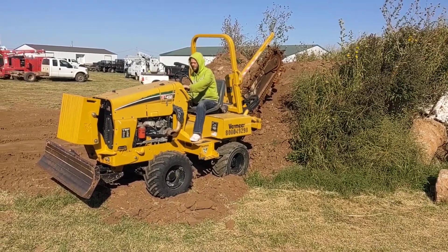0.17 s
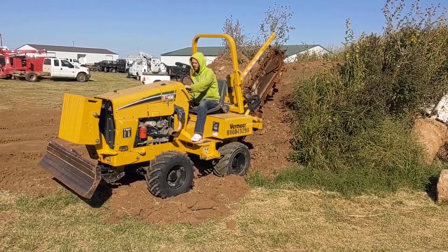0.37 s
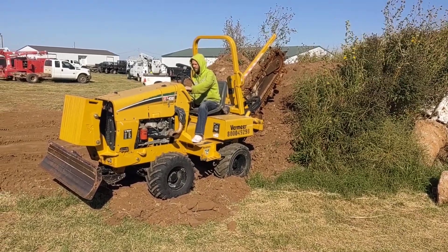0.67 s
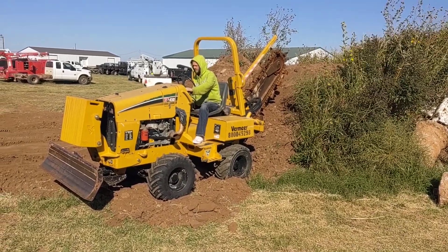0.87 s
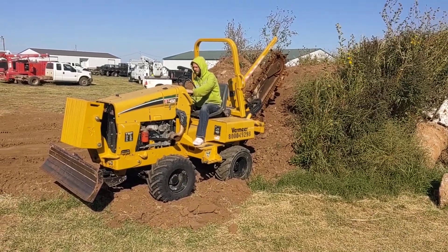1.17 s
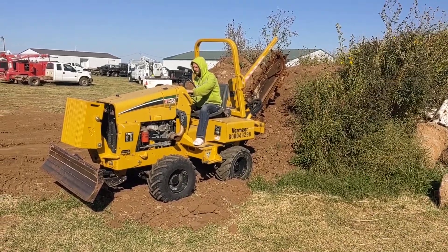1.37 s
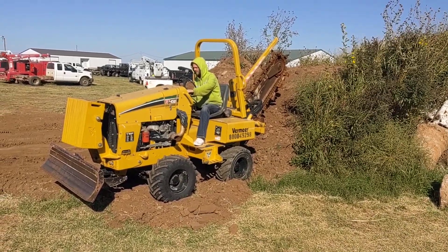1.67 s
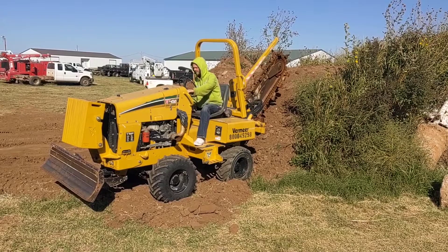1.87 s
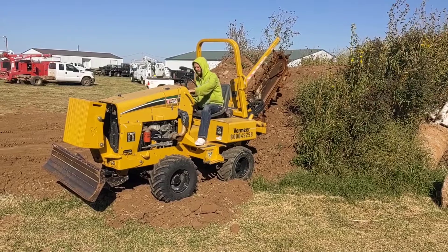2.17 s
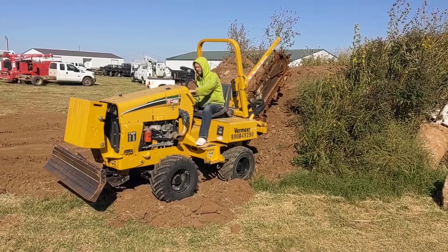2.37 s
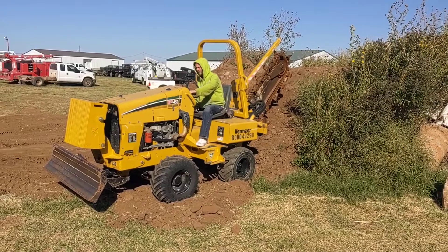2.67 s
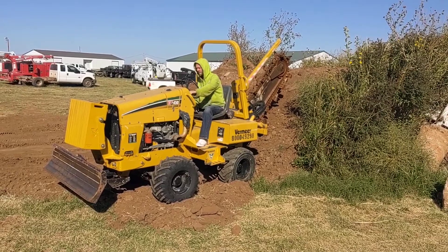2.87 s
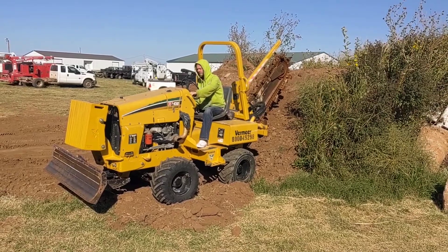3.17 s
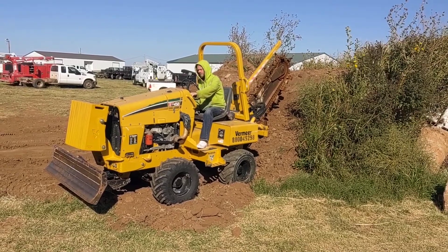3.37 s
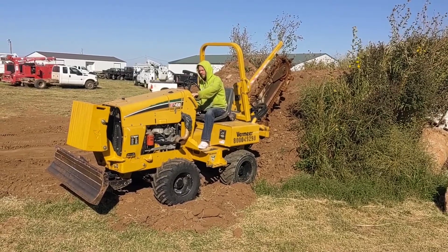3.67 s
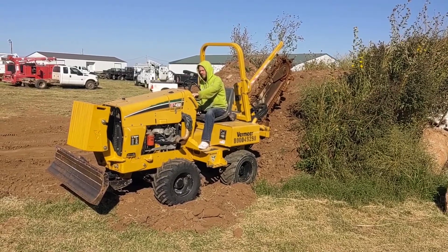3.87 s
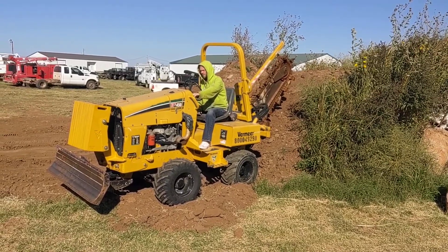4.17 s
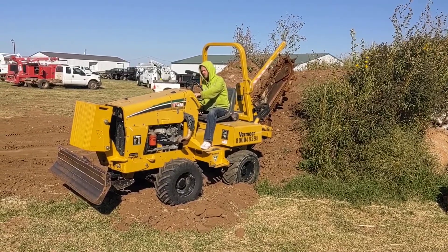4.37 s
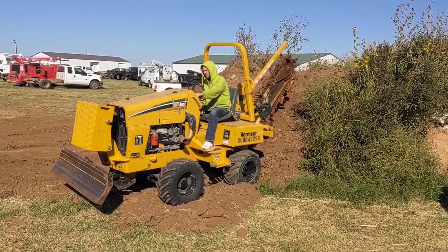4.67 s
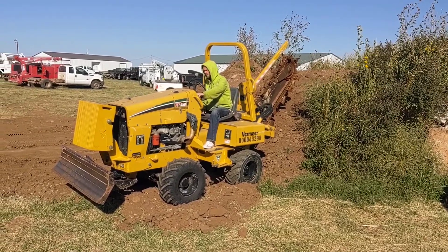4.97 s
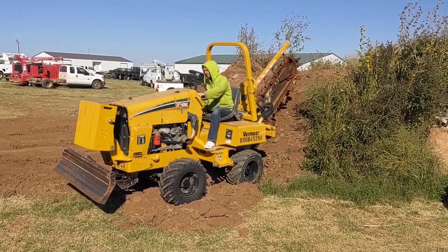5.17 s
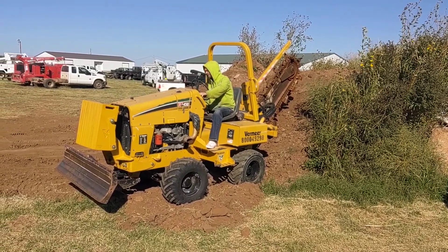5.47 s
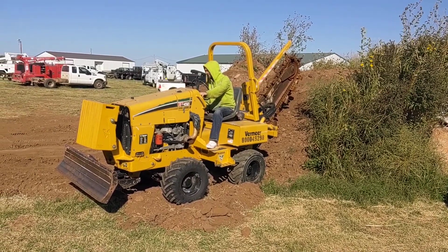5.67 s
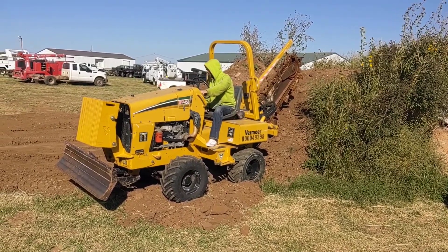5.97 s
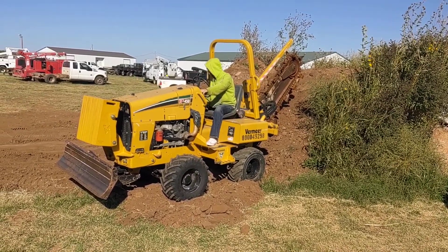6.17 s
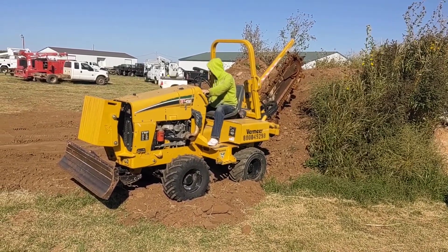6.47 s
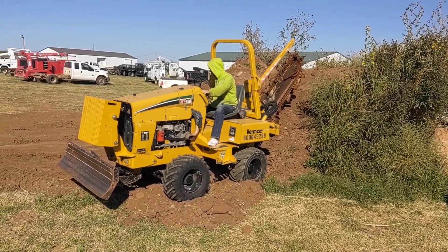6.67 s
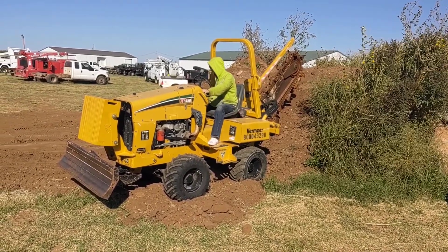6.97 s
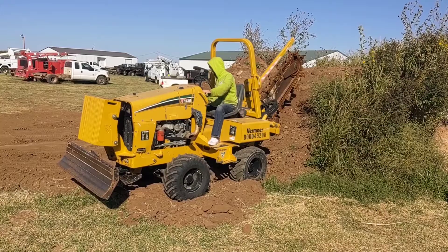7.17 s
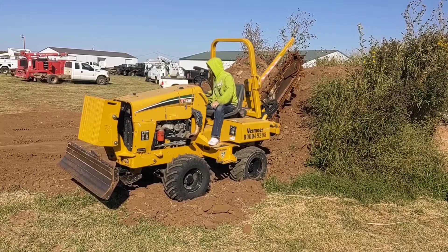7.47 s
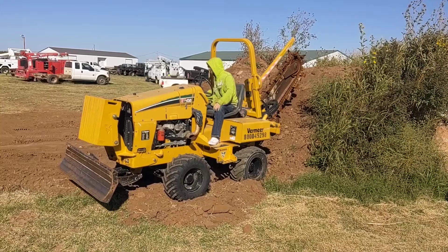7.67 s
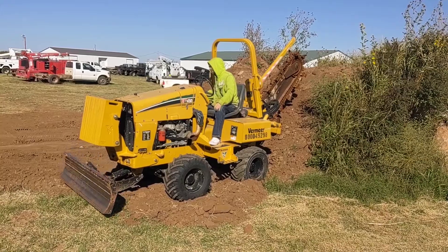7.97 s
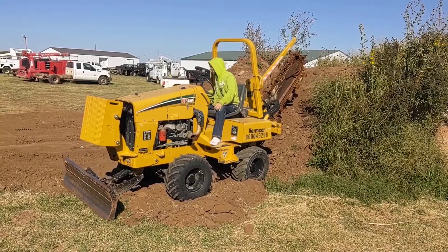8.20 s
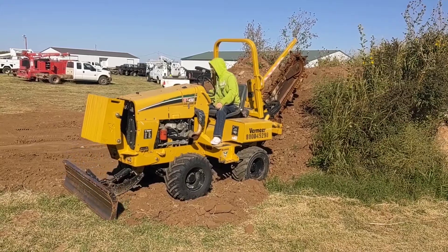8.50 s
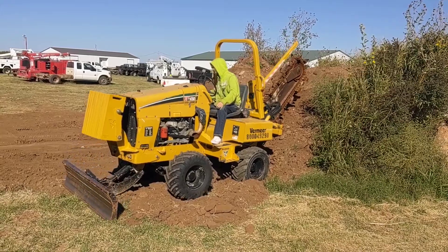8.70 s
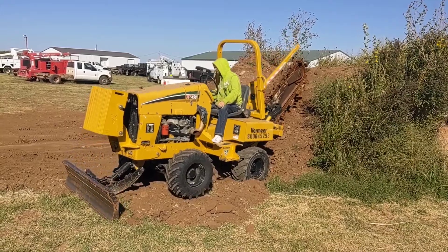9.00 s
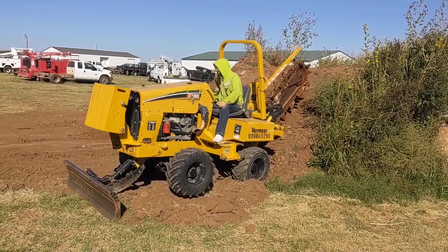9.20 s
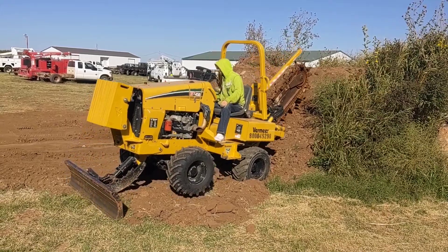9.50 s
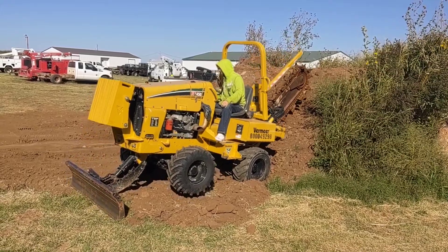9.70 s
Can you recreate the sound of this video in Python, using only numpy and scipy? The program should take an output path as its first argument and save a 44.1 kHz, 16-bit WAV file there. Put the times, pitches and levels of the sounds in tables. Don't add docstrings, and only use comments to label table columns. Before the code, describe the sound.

A four-cylinder diesel digger idles with quiet clatter, then throttles up to a loud steady roar with gear whine while wind buffets the microphone.

```python
import sys
import numpy as np
from scipy import signal
from scipy.fft import rfft, irfft
from scipy.io import wavfile
from scipy.ndimage import uniform_filter1d

SR = 44100
rng = np.random.default_rng(int(sys.argv[2]) if len(sys.argv) > 2 else 0)


def invert_db(x):
    u = np.asarray(x, float) / 20
    return 10 ** u


def generate_wav(signal):
    frames = np.transpose(np.atleast_2d(signal))
    scaled = np.clip(frames, -1, 1) * 32767
    pcm = np.round(scaled).astype(np.int16)
    wavfile.write(sys.argv[1], SR, pcm)


N = 433944
T = np.arange(N) / SR
FRAME = 512

CLACK_ANGLES = (.12, .33, 1.04, 1.36, 2.03, 2.38, 2.73, 3.04, 3.36)
CLACK_DB = (-4, -5, 2.5, -4, -6, -7, -7, 3.5, -4)
PART_RATES = (30, 32.5, 43, 53, 56.5, 66, 77, 82.5)


def evened(x):
    return x / np.sqrt(np.mean(x ** 2, axis=-1, keepdims=True) + 1e-20)


def smoothed(x, size, axis=-1):
    return uniform_filter1d(uniform_filter1d(x, size, axis), size, axis)


def curves(rows, t):
    s, *columns = np.transpose(rows)
    return np.array([np.interp(t, s, column) for column in columns])


def read(rows, hz):
    return curves([(np.log(f + 1), *values) for f, *values in rows], np.log(hz + 1))


def firing_rate(t):
    # time_s, rate_hz [firings per second]
    throttle = [(0, 30.03), (.96, 29.99), (1.44, 31.05), (1.92, 31.95), (2.4, 35.95), (3.12, 43.95),
                (3.84, 53.0), (4.8, 65.85), (5.04, 68.22), (5.28, 69.15), (6.0, 76.85), (6.24, 79.15),
                (6.72, 80.2), (7.2, 83.5), (7.44, 83.82), (7.92, 82.14), (8.16, 81.92), (9.84, 82.11)]
    return curves(throttle, t)[0]


def drive(t):
    # time_s, loudness_db [rms], load_db
    effort = [(0, -35, -10), (1.05, -40, -7), (1.75, -42.5, 0), (2.1, -41, -1), (2.8, -41, -0.5),
              (3.15, -39.5, 2), (3.5, -37.5, 2), (3.95, -32.5, -4), (4.15, -30.5, -3), (4.5, -24.5, -1),
              (4.88, -19, -6.5), (5.28, -18.5, 0.5), (5.6, -16, -3), (7.0, -15.5, -0.5), (7.5, -14, -3.5),
              (8.75, -13, -10.5), (9.05, -14.5, -22), (9.84, -13, -18)]
    return curves(effort, t)


def by_speed(rates, rows, t):
    return np.array([np.interp(firing_rate(t), rates, row) for row in rows])


def left_lead(hz):
    # pitch_hz, lead_rad
    lead = [(100, 0.076), (1000, 0.73), (2000, 0.32), (3600, 3.48), (5100, 3.98), (16000, 18.1)]
    return read(lead, hz)[0]


def strikes(angles, dbs, ring_s, jitter_s, spread_db, fresh=0, advance=0, hz=None):
    rate = firing_rate(T)
    firings = np.cumsum(rate) / SR + advance * (rate - rate[0])
    cycles = np.maximum.accumulate(firings) / 4
    age = np.arange(2048) / SR
    fade = np.exp(-age / ring_s)
    fall = fade * (1 - np.exp(-age / 0.00092))
    kept, shape = np.zeros((2, N)), np.zeros(N)
    for angle, db in zip(angles, dbs):
        turn = np.arange(int(cycles[-1])) + angle / 4
        late, size = rng.standard_normal((len(turn), 2)).T
        at = ((np.interp(turn, cycles, T) + jitter_s * late) * SR).astype(int)
        train = np.zeros(N)
        train[np.clip(at, 0, N - 1)] = invert_db(db + spread_db * np.clip(size, -2, 2))
        voice = rng.standard_normal((2, len(fall)))
        if hz:
            pitch = hz * (1 + 0.0085 * voice[0, 0] + 0.035 * fade)
            voice = np.sin(2 * np.pi * pitch * age + [[.45], [0]])
        kept += signal.oaconvolve(train[None], voice * fall, axes=1)[:, :N]
        shape += train ** 2
    rattle = np.sqrt(abs(signal.oaconvolve(shape, fall ** 2)[:N])) * rng.standard_normal((2, N))
    fresh = np.clip(fresh, 0, 1)
    x = np.sqrt(1 - fresh) * kept + np.sqrt(fresh) * rattle
    return x / np.sqrt(smoothed((x ** 2).mean(0), SR // 3) + 1e-12)


def block_sources():
    cylinder_db = (1.5, 2, 5, 3)
    roar = rng.standard_normal((2, N))
    clack = strikes(CLACK_ANGLES, CLACK_DB, ring_s=0.0085, jitter_s=.00004, spread_db=-2.5, fresh=0.06)
    place, strength = rng.random((14, 2)).T
    tappets = strikes((np.arange(14) + place) * 4 / 14, 4 * strength,
                      ring_s=.004, jitter_s=.00004, spread_db=1.5, fresh=.2)
    knock = strikes(np.arange(4) + .55, cylinder_db,
                    ring_s=.004, jitter_s=.0002, spread_db=2.2, fresh=.6, advance=.012)
    tick = strikes((np.arange(6) + .83) * 4 / 6, np.zeros(6),
                   ring_s=.005, jitter_s=.0004, spread_db=2.2, fresh=.8)
    return np.array([roar, clack, tappets, knock, tick])


def share_out(z, hz, t):
    part_db = [
        (-5, -17, -20, -20, -7, -20, -18, -21),
        (-10.5, -2, -11, -17, -8, -7, -2, 1.5),
        (-16, -3.5, -5, -2.5, -4, -3, -3.5, -4.5),
        (6, 1, 3.5, 1, -13, -9, -8, -18),
    ]
    # pitch_hz, clack_db, tappets_db, knock_db, tick_db
    reach = [(199, 8, -7.5, 6.5, -48), (900, -2, 3, -11.5, -34), (2010, -0.5, 4, 2.5, -8),
             (4930, 4, 0.5, -1, -12), (8400, 8, 1, 5.5, -5), (14900, -17, -23, -6, 7)]
    share = invert_db(read(reach, hz)[:, :, None] + by_speed(PART_RATES, part_db, t)[:, None])
    share = np.r_[np.ones((1, *share.shape[1:])), share]
    share = share / np.linalg.norm(share, axis=0)
    patches = rng.standard_normal((len(t), len(hz)))
    patches = uniform_filter1d(uniform_filter1d(patches, 22, 0), 7, 1).T
    return (z * share[:, None]).sum(0) * invert_db(1.1 * patches / patches.std())


def block_colour(hz, t):
    # pitch_hz, idle_db, full_speed_db
    colour = [(40.2, -111, -112), (136, -68.5, -44), (256, -85, -63), (400, -73, -56), (635, -79, -64),
              (1160, -81, -53), (1502, -66, -52), (2233, -56.5, -40), (2960, -61, -47.5),
              (3630, -70, -48.5), (5100, -85.5, -64), (7470, -87.5, -62.5), (10000, -101, -76.5),
              (17500, -107, -92)]
    # pitch_hz, width_hz, idle_db, full_speed_db
    rings = [(356, 62, -1, 4), (516, 44, 0, 7), (815, 125, 10, 12), (1040, 57, 4.5, -1),
             (1192, 130, 16.5, -9), (1893, 48, 12.5, 4), (5400, 800, 11.5, 0), (8000, 520, 10, 3),
             (8930, 640, 11, 2), (14500, 550, 12, 2), (15440, 800, 5, 12)]
    # start_s, end_s, pitch_hz, width_hz, level_db
    passing_bands = [(2.9, 4.1, 14200, 500, 7), (3.3, 4.3, 13500, 700, 4), (4.2, 4.7, 14300, 1100, 9),
                     (2.7, 4, 9100, 550, 3), (6.3, 7.9, 3000, 740, 2), (3, 5.7, 15550, 650, 8.5),
                     (3.03, 3.75, 11750, 500, 7), (3.74, 3.7, 9700, 500, 10), (3.4, 4.6, 2310, 360, 6),
                     (4.16, 5.9, 5910, 820, 6), (4.3, 6.1, 3220, 370, 7), (7.7, 9.894, 10100, 790, 4),
                     (8.9, 9.2, 6800, 940, 9.5)]
    idle, full = read(colour, hz) + sum(
        np.outer(db, 1 / (1 + (2 * (hz - f) / w) ** 2)) for f, w, *db in rings)
    rev = np.clip((firing_rate(t) - 31) / 42, 0, 1)
    right = invert_db(np.outer(idle, 1 - rev) + np.outer(full, rev))
    for start, end, f, w, db in passing_bands:
        during = np.clip(np.minimum(t - start, end - t) / 0.14 + .5, 0, 1)
        right = right * invert_db(db * np.outer(np.exp(-(2 * (hz - f) / w) ** 2), during))
    return right


def band_gain_db(power, hz, t):
    # low_hz, high_hz
    bands = [
        (550, 1200),
        (1300, 3500),
        (4500, 9000),
        (10000, 15800),
    ]
    bright = [
        (-23, -25.5, -23, -23, -20.5, -23, -19.5, -19),
        (-46, -46, -45, -40, -32, -29, -26.5, -25.5),
        (-55.5, -53.5, -46.5, -42.5, -44, -37, -35, -35.5),
    ]
    follow = (0.51, 0.22, .2)
    # start_s, end_s, build_up_s, covers_db, hiss_db
    swells = [
        (3.84, 4.214, 0.19, 3, 11),
        (9.1, 9.9, 0.13, 1, 2),
    ]
    level = drive(t)[0]
    body, *upper = by_speed(PART_RATES, bright, t) + np.outer(follow, level)
    for start, end, rise, *db in swells:
        swell = np.clip((t - start) / rise, 0, 1) * np.clip((end - t) / 0.087 + .5, 0, 1)
        upper = np.array(upper) + np.outer(db, swell)
    have = [10 * np.log10(power[(hz > lo) & (hz < hi)].sum(0)) for lo, hi in bands]
    missing = np.array([body, level, *upper]) - have
    middles = [(np.sqrt(lo * hi), *row) for (lo, hi), row in zip(bands, np.eye(len(bands)))]
    return read(middles, hz).T @ missing


def surge_gain_db(hz, t):
    # start_s, level_db
    surges = [
        (2.96, 9),
        (3.27, 7),
        (3.51, 9),
        (3.795, 9),
        (4.03, 7),
    ]
    pitch_hz, width_hz, hold_s, fade_s = 2630, 450, .05, .035
    surge_db = sum(db * (t >= s) * np.exp(-np.maximum(t - s - hold_s, 0) / fade_s) for s, db in surges)
    return np.outer(np.exp(-(2 * (hz - pitch_hz) / width_hz) ** 2), surge_db)


def block():
    # pitch_hz, left_over_right_db, likeness [0-1]
    ports = [(100, 4.5, 0.96), (640, -1, 0.99), (1030, 2.5, 0.91), (1500, 0, 0.8), (2400, -5, 0.64),
             (3470, -2.5, 0.66), (3650, 0.6, 0.84), (4730, 7.5, 0.8), (7040, 4.5, 0), (8140, -2, 0.4),
             (9840, 10, 0), (12500, 10, 0), (15500, 10, .3)]
    hz, t, z = signal.stft(block_sources(), SR, nperseg=FRAME, noverlap=FRAME * 3 // 4)
    a, b = share_out(z, hz, t)
    right = block_colour(hz, t)
    over_db, same = read(ports, hz)
    same = np.clip(same, 0, 1)
    left = invert_db(over_db) * np.exp(1j * left_lead(hz))
    both = 1 + abs(left) ** 2 + 2 * same * left.real
    power = both[:, None] * right ** 2 / (2 * FRAME)
    right = right * invert_db(band_gain_db(power, hz, t) + surge_gain_db(hz, t))
    same = same[:, None]
    pair = [right * left[:, None] * a, right * (same * a + np.sqrt(1 - same ** 2) * b)]
    return signal.istft(np.array(pair), SR, nperseg=FRAME, noverlap=FRAME * 3 // 4)[1][:, :N]


def cover():
    struck_db = [
        (-4, -15, -25, -30, -30, -30, -33, -33),
        (-26, -9, -7, -8, -7, -9, -5, -2.5),
    ]
    settle_s, settle_db = 7.82, -24
    valves_db, knock_db = by_speed(PART_RATES, struck_db, T) + drive(T)[0]
    knock_db = knock_db + settle_db * np.clip((T - settle_s) / 0.3 + .5, 0, 1)
    valves = strikes(CLACK_ANGLES, CLACK_DB, ring_s=.0042, jitter_s=.0003, spread_db=2.0, hz=1915)
    knock = strikes(np.arange(4) + .62, (0, -13, -12, -8),
                    ring_s=.006, jitter_s=.0004, spread_db=2.5, advance=.0048, hz=1975)
    return (valves * invert_db(valves_db) + knock * invert_db(knock_db)) * invert_db([[-1.5], [1.5]])


def exhaust_and_gears():
    crank_orders = (1, 2, 3, 4, 4.5, 5, 5.5, 10.5, 11.5)
    crank_rates = (30, 50, 70, 79.5, 82.2)
    crank_order_db = [
        (-32, -17, -16, -21, -17.5),
        (-12, -4, -5.5, -7.5, -13),
        (-8, -10, -19.5, -18, -22),
        (-11.5, -13.5, -15, -17, -18),
        (-16, -22, -45, -59, -15),
        (-30, -22, -44, -29, -25),
        (-30, -35, -18, -32, -26),
        (-31, -32, -32, -18, -30),
        (-26, -36, -19, -34, -35),
    ]
    load_share = (0.74, 0.99, 0.47, 0.087, 0.058, 0.043, .05, 0.042, .05)
    # order [multiple of the firing rate], level_db [rms at full speed]
    gears = [(2.5, -41.5), (6, -41.5), (6.5, -43.5), (10.25, -45), (12, -39), (12.75, -38), (13.5, -43.5),
             (18, -37), (18.25, -36.5), (19, -34.5), (19.5, -38)]
    # order [multiple of the firing rate], level_db [rms at idle]
    idle_hum = [(6, -52.5), (10, -57), (12.5, -54), (14.25, -59), (17.75, -53), (27, -49)]
    rate = firing_rate(T)
    turns = 2 * np.pi * np.cumsum(rate) / SR
    level, load = drive(T)
    whine_db = level + 16.5 - 1.2 * abs(82 - rate)
    hum_db = level + 34 - 1.2 * abs(rate - 30)
    levels = list(level + by_speed(crank_rates, crank_order_db, T) + np.outer(load_share, load))
    levels += [db + whine_db for k, db in gears]
    levels += [db + hum_db for k, db in idle_hum]
    orders = list(crank_orders) + [np.round(4 * k) / 4 for k, db in list(gears) + list(idle_hum)]
    out = np.zeros((2, N))
    for k, db in zip(orders, levels):
        waver, drift = evened(uniform_filter1d(rng.standard_normal((400, 2)), 5, 0).T)
        slow = np.linspace(0, T[-1], len(waver))
        angle = k * turns + 2 * np.pi * rng.random() + 0.27 * np.interp(T, slow, drift)
        size = np.sqrt(2) * invert_db(db + 2.35 * np.interp(T, slow, waver))
        out += size * np.array([invert_db(3.5) * np.cos(angle + left_lead(k * rate)), np.cos(angle)])
    return out


def flutter():
    # start_s, end_s, level_db
    gusts = [
        (1.2, 2.7, -50.5),
        (2.7, 3.7, -48),
        (3.7, 4.05, -32),
        (4.2, 5.52, -26.5),
        (5.83, 6.06, -25),
        (6.38, 7.55, -22),
        (7.7, 8.28, -20),
        (8.76, 9.09, -22),
        (9.28, 9.57, -19.5),
    ]
    gap_s, length_s, spread_db = .07, .024, 4
    late, size, wide = rng.random((int(T[-1] / gap_s), 3)).T
    at = (np.arange(len(late)) + .8 * late) * gap_s
    return [(s, db + spread_db * (2 * u - 1), length_s * (0.58 + w))
            for s, u, w in zip(at, size, wide) for start, end, db in gusts if start <= s < end]


def wind():
    # middle_s, level_db, length_s
    puffs = [(2.948, -40, 0.033), (3.33, -37.5, 0.041), (3.808, -25, 0.026), (4.092, -26, 0.038),
             (4.139, -15, 0.025), (4.297, -17.5, 0.046), (4.38, -17.5, 0.04), (4.443, -15, 0.015),
             (4.597, -21, 0.041), (4.9, -19, 0.035), (4.938, -7.5, 0.0089), (5.055, -23, 0.069),
             (5.227, -28, .026), (6.3, -20.5, 0.075), (6.545, -6.5, 0.015), (6.63, -16.5, 0.058),
             (6.78, -14, 0.037), (7.03, -11.5, .081), (7.117, -3.5, 0.018), (7.365, -17.5, 0.055),
             (7.85, -18, 0.02), (7.939, -12, 0.023), (8.01, -14, 0.015), (8.13, -12, 0.085),
             (8.263, -15, 0.018), (8.588, -17, 0.048), (8.849, -14, 0.042), (8.919, -7, 0.012),
             (8.987, -17.5, 0.075), (9.42, -16.5, 0.022)]
    # pitch_hz, level_db
    gust = [(25, -50), (60, -9.5), (130, 1.5), (220, 2.5), (320, -2), (450, -6), (650, -15.5), (1600, -50)]
    # start_s, peak_db, pitch_hz
    slap = (5.8555, -3, 240)
    lumps = invert_db(3.8 * evened(smoothed(rng.standard_normal((2, N)), 200)))
    spectrum = rfft(rng.standard_normal((2, N)) * lumps)
    noise = irfft(spectrum * invert_db(read(gust, np.fft.rfftfreq(N, 1 / SR))[0]), N)
    push = np.zeros(N)
    for s, db, length in list(puffs) + flutter():
        near = slice(max(int((s - .3) * SR), 0), int((s + .3) * SR))
        push[near] += invert_db(2 * db) * np.exp(-(1.66 * (T[near] - s) / length) ** 2)
    out = evened(noise) * np.sqrt(push) * invert_db([[5.5], [-9.5]])
    s, db, hz = slap
    age = np.maximum(T - s, 0) * hz
    out[1] -= invert_db(db) * np.sin(2 * np.pi * age) * np.exp(-age ** 2 * 1.1)
    return out


def scene():
    return block() + cover() + exhaust_and_gears() + wind()


def low_pass(x):
    return signal.sosfilt(signal.butter(12, 16710, fs=SR, output="sos"), x)


def record(dry):
    power_db = 10 * np.log10(uniform_filter1d((dry ** 2).max(0), 500) + 1e-12)
    fall = T * 200.
    held_db = np.maximum.accumulate(power_db + fall) - fall
    over_db = np.maximum(held_db + 11.0, 0)
    ducked = np.clip(dry / invert_db(.75 * uniform_filter1d(over_db, 150)), -.97, .97)
    edge = signal.firwin(2047, 15850, window=("kaiser", 9), fs=SR)  # low-pass, Hz
    return low_pass(signal.oaconvolve(ducked, edge[None], "same", axes=1))


dry = scene()
out = record(dry)
generate_wav(out)
```